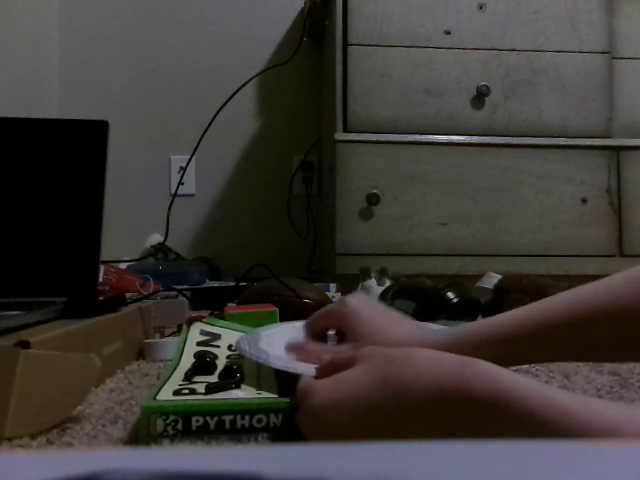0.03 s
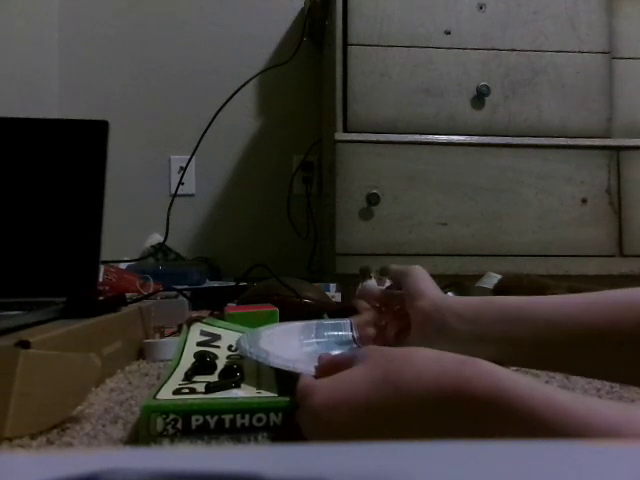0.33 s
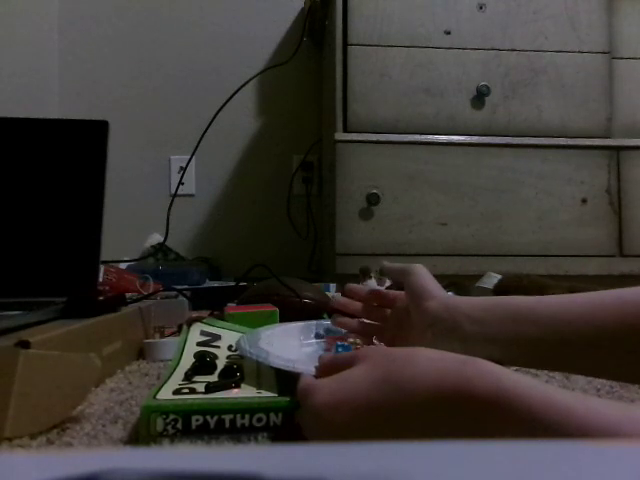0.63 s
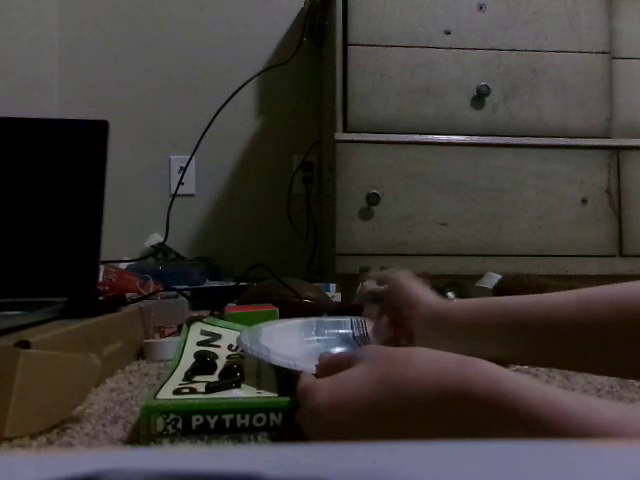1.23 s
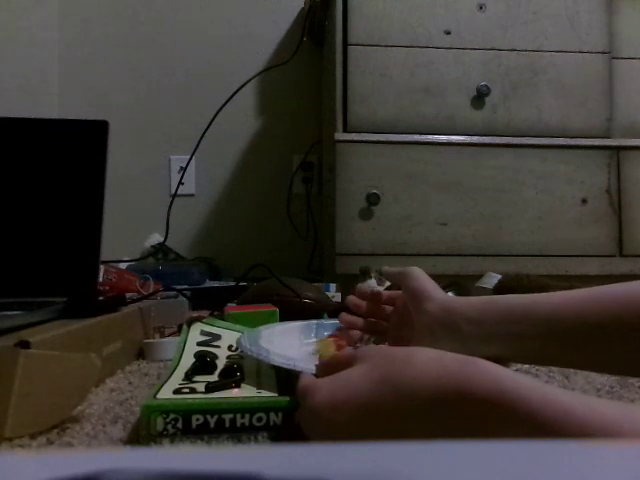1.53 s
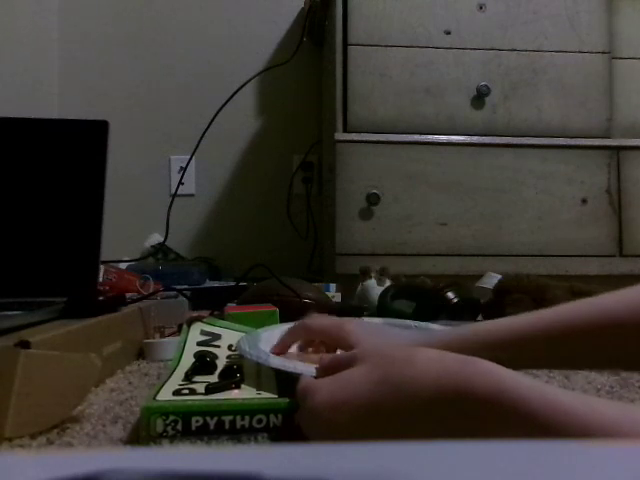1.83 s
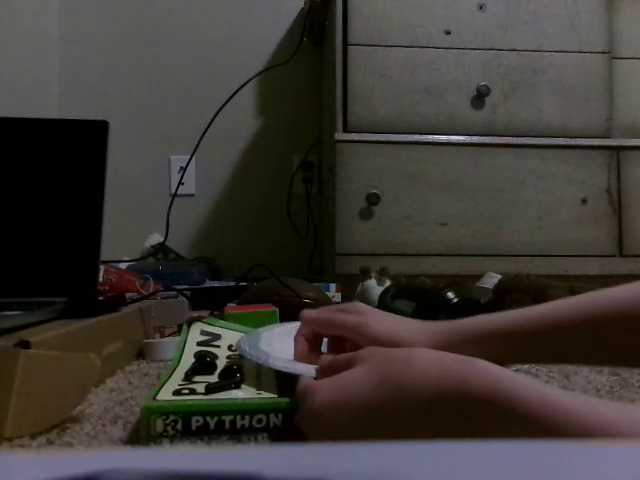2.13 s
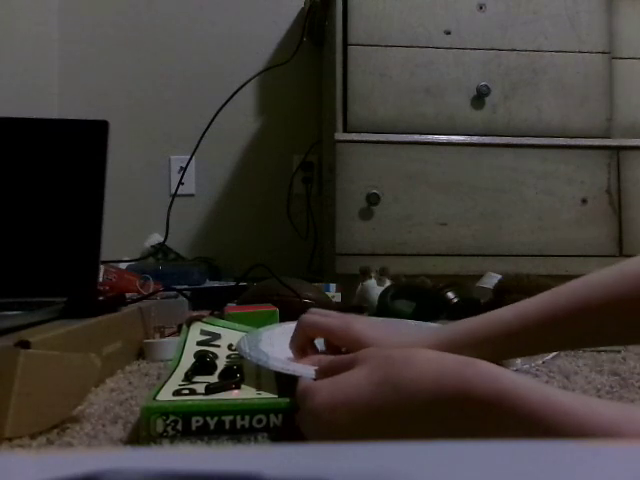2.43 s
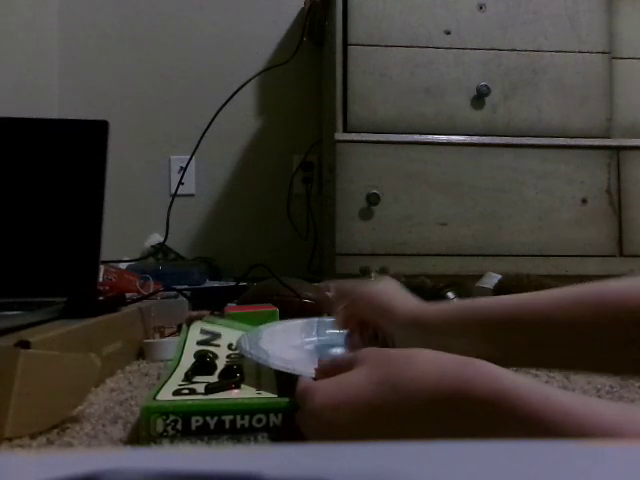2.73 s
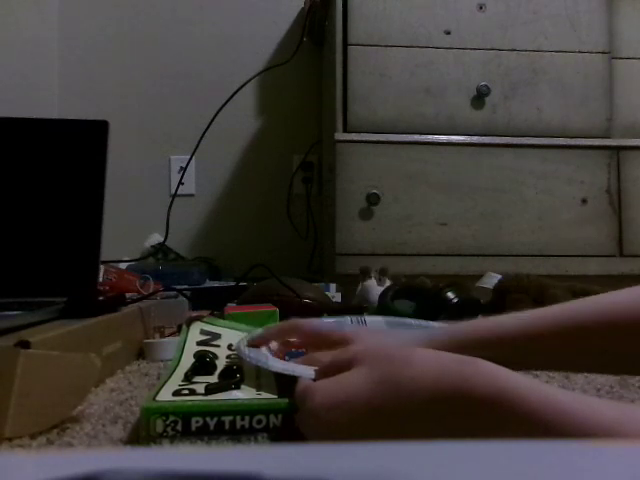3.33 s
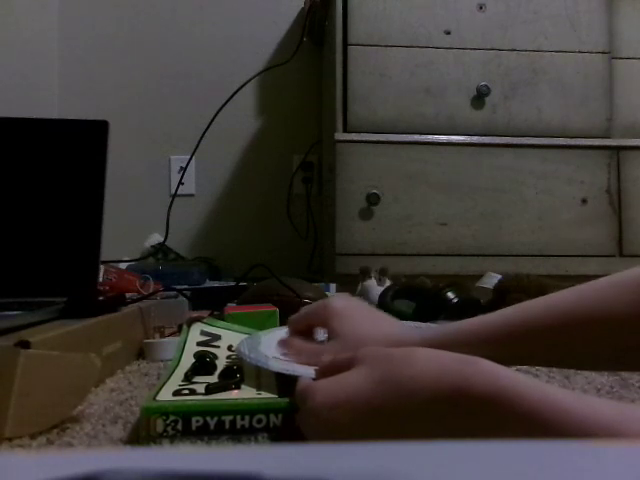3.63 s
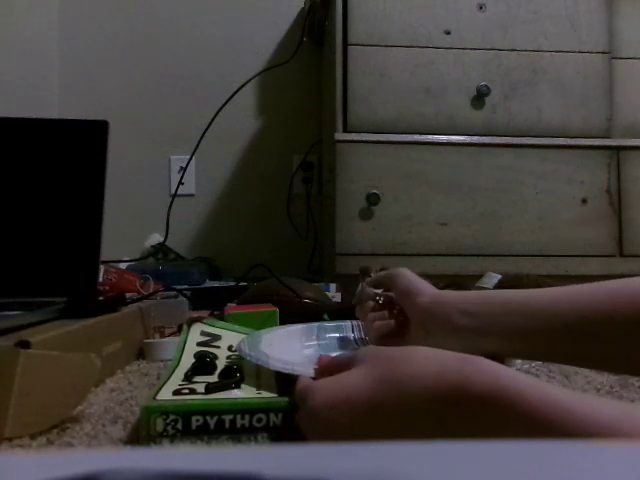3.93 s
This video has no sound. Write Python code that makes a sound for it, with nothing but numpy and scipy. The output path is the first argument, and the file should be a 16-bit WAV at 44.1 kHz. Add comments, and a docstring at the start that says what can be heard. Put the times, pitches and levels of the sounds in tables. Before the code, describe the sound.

Small dice clatter into a thin plastic dish three times, scooped up by hand between drops.

```python
"""Small dice drop into a thin plastic dish, scooped up by hand and let fall three times over.
Each landing clacks on the plastic, buzzes the wall and thumps the bottom like a small drum;
die against die gives a short bright click. Between the clear hits the dice tumble in the dish
or jostle and tick in the fist, and the hand bumps the dish with a soft knock.
Behind them is a quiet furnished room with a low rumble, faint hiss and hum."""
import sys
import numpy as np
from scipy import signal
from scipy.fft import rfft, irfft, next_fast_len
from scipy.io import wavfile
from scipy.ndimage import map_coordinates

SR = 44100
rng = np.random.default_rng(int(sys.argv[2]) if len(sys.argv) > 2 else 0)


def pcm_store(signal):
    """Save signal as 16-bit PCM."""
    levels = np.round(np.clip(np.atleast_2d(signal), -1, 1) * 32767)
    wavfile.write(sys.argv[1], SR, levels.astype(np.int16).T)


N = 176400

# Cue levels are set ahead of the trims below; an EQ gives only the shape of a spectrum.
# dice landing in the dish: start_s, level_db, tilt_db_per_octave, thump_db, pitch_hz
LANDINGS = [(0.4326, -31, 2.5, -24.5, 295), (0.441, -31, 3, -57, 350), (0.471, -33.5, 2, -32.5, 345),
            (0.5365, -36, 5, -31, 289), (0.5418, -37, 3.5, -47, 315), (0.5496, -32.5, -1.5, -33, 329),
            (0.5544, -33.5, 0.5, -42, 318), (0.6076, -36, 1.5, -32.5, 277), (0.6152, -33, 1, -41, 310),
            (0.579, -35.5, 4, -54, 330), (0.6712, -33.5, 0.5, -37, 353), (0.718, -43, 6, -51, 327),
            (0.722, -39.5, 0.5, -41, 340), (0.7614, -42.5, -4.5, -49, 266), (0.9118, -50, 6, -46, 323),
            (0.9368, -43, 1, -33.5, 322), (0.9412, -39, -0.5, -42, 320), (1.3679, -35, -5, -27, 346),
            (1.3755, -38, 7, -33.5, 315), (1.3864, -40.5, 4.5, -57, 318), (1.4431, -36.5, 1.5, -23.5, 334),
            (1.466, -31, -4, -34, 426), (1.4682, -32, 7, -30, 397), (1.4903, -51, 13, -26, 301),
            (1.523, -33, 1.5, -22, 314), (1.541, -46, 11, -58, 387), (1.5499, -35.5, -0.5, -42, 375),
            (1.6, -61, -3, -29, 276), (1.6032, -34.5, 0.5, -58, 278), (1.6492, -51, 2, -33.5, 341),
            (1.6658, -36.5, 1.5, -30.5, 342), (1.8209, -40.5, 0.5, -39, 423),
            (1.8627, -34.5, -15.5, -70, 320), (1.8762, -43.5, 2, -28.5, 330), (1.981, -49, 3, -31, 303),
            (2.1252, -39.5, -10, -44, 294), (2.1406, -39, 3, -39, 400), (2.171, -45, -3, -39.5, 300),
            (2.2686, -42, 5, -33.5, 337), (2.4029, -35, -1, -65, 395), (2.4085, -38.5, -10, -44, 410),
            (2.9432, -33.5, 2.5, -30, 350), (2.952, -31.5, 2, -26.5, 288), (2.9828, -39, 7, -43, 303),
            (2.989, -37, 0, -31.5, 310), (3.0127, -33.5, -3.5, -59, 334), (3.0232, -36, -5, -31.5, 313),
            (3.0564, -28, -6, -28, 345), (3.0948, -41, 2, -41, 310), (3.1109, -38.5, -11, -30.5, 325),
            (3.198, -35, 4, -34.5, 432), (3.355, -31.5, -1.2, -34, 435), (3.3656, -38, -1, -55, 430),
            (3.3703, -38, -3, -38, 402), (3.4872, -30.5, -13.5, -52, 315), (3.8723, -31, -5.5, -35, 408)]
# tone of a die hitting plastic: frequency_hz, level_db
CLACK_EQ = [(200, -26.5), (370, 8), (700, -1), (1300, 3.5), (1800, 5), (2600, 2.5), (3600, 1.5), (5000, -5),
            (6500, -14), (9500, -12), (12000, -21.5), (16000, -36)]
# tone of the buzzing dish wall: frequency_hz, level_db
BUZZ_EQ = [(1200, -30.5), (2300, 0.5), (3200, 1.5), (5500, -24)]
# modes of the dish bottom under a die: pitch_ratio, level_db, t60_s
BOTTOM_MODES = [(.78, -45, 0.069), (1.002, 4, 0.039), (1.327, -8, 0.065), (2.15, -13.5, 0.039)]
# dice striking each other: start_s, level_db, tilt_db_per_octave, thump_db
COLLISIONS = [(0.018, -37, -1, -60), (0.0302, -30, 0, -69), (0.033, -29, 5, -62), (0.044, -33, -4.5, -62),
              (0.0861, -35, -4.5, -52.5), (0.4815, -35, -5.5, -63), (0.5083, -48, -2, -67),
              (0.5235, -43, -1, -68), (0.558, -38, -2, -60), (0.5668, -37.5, -6, -56),
              (0.5996, -40, -2, -37), (0.6386, -36.5, 0, -61), (0.887, -31.5, 20, -61),
              (0.949, -26.5, 3.5, -41), (0.9597, -29, 0.5, -69), (0.9642, -28.5, -3.5, -64),
              (0.9727, -30, -1, -47), (0.9778, -32, 2, -52), (0.9876, -34, 0, -43),
              (0.9913, -30.5, 3, -42.5), (1.028, -35, -2, -50), (1.0438, -30.5, 7, -53),
              (1.0478, -27.5, 0, -45), (1.0799, -35.5, -2.5, -72), (1.405, -37.5, 3, -45),
              (1.427, -30, -5.5, -54), (1.4544, -36, 1, -62), (1.5175, -31.5, -2.5, -46),
              (1.5541, -30.5, -8.5, -34.5), (1.5649, -36.5, -5, -39), (1.6278, -42, -4, -63),
              (1.7095, -44.5, 7, -45), (1.8384, -27.5, 11, -43), (1.955, -29.5, -5.5, -46),
              (1.9579, -32.5, 0, -42), (1.969, -28.5, -2, -56), (2.0074, -29.5, 14, -59),
              (2.0178, -35, 12, -53), (2.0245, -37, 4, -50), (2.0289, -31, 4, -61), (2.4071, -31, 11, -66),
              (2.4158, -28.5, -6.5, -52), (2.4255, -29.5, 10, -61), (2.4278, -28, -2, -50),
              (2.463, -38.5, 0.5, -39.5), (2.54, -36, -1, -48), (2.9405, -37.5, 6, -58),
              (2.9647, -35.5, -6, -65), (2.9705, -32.5, 4, -66), (3.0066, -36, 7, -51),
              (3.0199, -29.5, 0, -33), (3.039, -40, 5, -64), (3.064, -31, 2, -54), (3.1174, -36.5, 1, -38),
              (3.1394, -46, 2, -61), (3.16, -40.5, -3, -59), (3.2716, -39.5, -4, -42.5),
              (3.3946, -36.5, -6, -52), (3.418, -38, 2, -68), (3.475, -37, -1, -76),
              (3.4793, -29, 1.5, -61), (3.5105, -33, 7, -51), (3.521, -37, -17, -47), (3.5746, -34, 8, -66),
              (3.5795, -29.5, 8, -43), (3.6129, -35, 2, -61), (3.6203, -41, -9, -68), (3.7331, -40, 1, -43),
              (3.7417, -38, -8, -73), (3.7463, -39, 6, -46), (3.7541, -24, -0.5, -55),
              (3.756, -27.5, 1.5, -35)]
# tone of die against die: frequency_hz, level_db
CLICK_EQ = [(400, -12), (1500, -14.5), (2400, -2), (3600, -3), (4800, 3.5), (6500, -0.5), (8500, 0.5),
            (10200, -0.5), (12000, -13), (16000, -26)]
# dice tumbling on the plastic: start_s, length_s, level_db, fade_db
TUMBLE_SPELLS = [(.445, 0.052, -38.5, 14), (.54, 0.049, -42, 3), (.61, 0.088, -46, -2.5),
                 (.71, 0.14, -48, 9.5), (.868, 0.028, -54, -12), (.91, 0.044, -46, -2.5),
                 (1.37, 0.057, -49, 22), (1.47, 0.12, -46.5, 2.5), (1.61, 0.11, -53, -5),
                 (1.85, 0.04, -40.5, 5.5), (1.9, .2, -52, -1.5), (2.12, 0.29, -50.5, 9.5),
                 (2.405, .035, -56, -5), (2.945, 0.21, -50, -8), (3.145, 0.2, -50, 0),
                 (3.366, 0.025, -44, 2.5), (3.39, 0.11, -54.5, -12)]
# tone of the tumbling: frequency_hz, level_db
TUMBLE_EQ = [(150, -39), (230, 7), (315, 14.5), (430, 6), (540, -3.5), (700, 2.5), (1000, -5), (2500, -3.5),
             (3500, -8), (5000, -10.5), (6500, -14.5), (9500, -15.5), (12000, -20), (16000, -51)]
# dice jostling as the fist closes or opens: start_s, length_s, level_db, fade_db
JOSTLE_SPELLS = [(0, 0.033, -38, 3.5), (.04, 0.07, -55, -2), (.848, 0.0017, -47.5, -3),
                 (.96, 0.041, -37.5, 8.5), (1.0, 0.094, -51.5, 1.5), (1.956, 0.033, -45, -6.5),
                 (1.99, 0.056, -50, -0.5), (2.381, 0.0016, -44, 0), (2.408, 0.025, -51.5, -5),
                 (2.44, 0.16, -45, 13), (3.49, 0.068, -50, -3), (3.573, 0.069, -45, 9),
                 (3.734, 0.011, -35.5, 3), (3.747, 0.0087, -36.5, -4), (3.76, 0.019, -36.5, 11)]
# tone of the jostling: frequency_hz, level_db
JOSTLE_EQ = [(200, -6), (330, 16), (600, -8.5), (1500, -4), (2400, -1), (3600, 4.5), (4800, -1), (6500, -3),
             (8800, 1.5), (10300, -1), (12000, -11.5), (16000, -36)]
# dice shifting in the closed fist: start_s, length_s, level_db, fade_db
SHIFT_SPELLS = [(.342, 0.13, -61, 1.5), (1.163, 0.0113, -59, 1), (1.32, 0.038, -71, 12),
                (2.827, .01, -39, 6.5), (3.978, 0.0043, -52, 0)]
# dice touching in the closed fist: start_s, level_db, tilt_db_per_octave
TICKS = [(0.2633, -53, -12), (0.286, -58.5, -11), (0.394, -44.5, -5), (0.4265, -37, -2), (1.162, -46, -7),
         (1.222, -56, -8), (1.3115, -44.5, -2), (1.3274, -46, -3), (1.3349, -44, 13), (1.3397, -41, -3),
         (1.352, -42, 8), (2.8047, -39.5, -5.5), (2.8263, -40, -1.5), (2.9143, -33, 5), (2.935, -44, -3),
         (3.722, -42.5, -8), (3.8508, -41, -12.5), (3.967, -32.5, -4), (3.9727, -43.5, 25),
         (3.998, -36.5, -9)]
# tone of dice muffled by the fist: frequency_hz, level_db
FIST_EQ = [(400, -13), (1500, -22.5), (2700, -4.5), (3400, -1.5), (4800, 4), (5600, -3), (6500, -6),
           (9500, -6), (12000, -17), (16000, -61)]
# a die left ringing faintly: start_s, level_db
DIE_PINGS = [(0.087, -54.5), (0.1, -55)]
# modes of that die: pitch_hz, level_db, t60_s
DIE_MODES = [(8060, -1, 0.14), (8290, -5, 0.1), (6720, -4, 0.14), (5230, -2, 0.14), (5480, -6, 0.09),
             (4360, -6, 0.1)]
# the hand bumping the dish: start_s, ring_db, push_db
HAND_KNOCKS = [(.087, -34, -51), (2.266, -41, -50), (2.568, -41, -58), (2.7635, -31.5, -28.5),
               (3.127, -31.5, -50), (3.4875, -23.5, -35)]
# the dull push of the flesh, gone in a few cycles: pitch_hz, level_db, t60_s
PUSH_MODES = [(215, 0, 0.015)]
# modes of the dish under a soft knock: pitch_hz, level_db, t60_s
KNOCKED_DISH_MODES = [(307, 0, 0.055), (450, -8, 0.045), (676, -17, 0.07), (1265, -30, 0.04)]
# reverb time of the room: frequency_hz, t60_s
REVERB_DECAY = [(200, 0.19), (1000, 0.35), (3000, 0.28), (8000, 0.27), (15000, 0.13)]
# reverb level across the spectrum: frequency_hz, level_db
REVERB_SEND = [(200, -0.5), (330, -11.5), (1000, -7), (3000, -7), (8000, -11), (15000, -10.5)]
# tone of the rumble and hiss: frequency_hz, level_db
ROOM_TONE_EQ = [(15, -7.5), (28, -10), (40, 2.5), (52, -22), (100, -16.5), (170, -20.5), (300, -22),
                (600, -37.5), (1200, -39), (4000, -42.5), (10000, -48.5), (16000, -51)]
# partials of the hum: pitch_hz, level_db
HUM_PARTIALS = [(28, -55.5), (81, -65.5), (120, -66), (162, -62.5)]

# envelope of a hit, a crack over a weaker ring: crack_t60_s, ring_db, ring_t60_s
CLACK_SHAPE, CLICK_SHAPE, TICK_SHAPE = (0.0065, -21, 0.03), (0.0055, -25, 0.018), (0.0053, -38, 0.011)
CLACK_TRIM_DB, BUZZ_TRIM_DB, CLICK_TRIM_DB, TICK_TRIM_DB = -2, -17.5, -4.5, -3.5
LANDING_THUMP_TRIM_DB, CLICK_THUMP_TRIM_DB = 0.5, 3.5
HIT_ATTACK_S, HIT_HEAD_S = 0.00035, 0.0025  # a hit's level is the rms of its head
ECHO_MIN_S, ECHO_MAX_S, ECHO_SUM_DB = 0.00078, 0.013, -13.5  # off the rim and the furniture
TOP_HZ = 16000


def landings():
    """Each falling die clacks on the plastic, shakes the wall and thumps the bottom."""
    out = np.zeros(N)
    for start_s, db, tilt, thump_db, pitch_hz in LANDINGS:
        add(out, start_s, amp(db + CLACK_TRIM_DB) * hard_hit(CLACK_EQ, tilt, CLACK_SHAPE, snap=2.35))
        add(out, start_s, amp(db + BUZZ_TRIM_DB) * wall_buzz())
        add(out, start_s, amp(thump_db + LANDING_THUMP_TRIM_DB) * bottom_thump(pitch_hz))
    return out


def hard_hit(eq, tilt, shape, snap, echoes=6):
    """One hard contact: a snap, a crack, the short ring of dense modes and a few close echoes."""
    crack_t60_s, ring_db, ring_t60_s = shape
    t = np.arange(SR // 12) / SR
    attack = 1 - np.exp(-t / HIT_ATTACK_S)
    decay = amp(-60 * t / crack_t60_s) + amp(ring_db - 60 * t / ring_t60_s)
    burst = rng.standard_normal(len(t)) * decay * attack
    burst[round(HIT_ATTACK_S * SR)] += snap
    direct = signal.fftconvolve(burst, eq_impulse(eq, tilt))
    direct /= np.sqrt(np.mean(direct[:round(HIT_HEAD_S * SR)] ** 2))
    delays_s = ECHO_MIN_S + (ECHO_MAX_S - ECHO_MIN_S) * rng.random(echoes) ** 2
    out = direct.copy()
    for delay_s, polarity in zip(delays_s, rng.choice([-1, 1], echoes)):
        add(out, delay_s, polarity * amp(ECHO_SUM_DB) / np.sqrt(echoes) * direct)
    return out


def wall_buzz(t60_s=0.17):
    """Many close modes of the thin plastic wall die away together."""
    t = np.arange(SR // 10) / SR
    burst = rng.standard_normal(len(t)) * amp(-60 * t / t60_s)
    return signal.fftconvolve(burst, eq_impulse(BUZZ_EQ))


def bottom_thump(pitch_hz):
    """The thin bottom of the dish flexes like a small drum."""
    modes = [(pitch_hz * ratio, db, t60_s) for ratio, db, t60_s in BOTTOM_MODES]
    return ring(modes, attack_s=0.0016, scatter_db=1.5)


def ring(modes, attack_s, scatter_db):
    """A struck body rings in damped sines, their balance fresh on every hit."""
    t = np.arange(SR // 6) / SR
    out = np.zeros(len(t))
    for hz, db, t60_s in modes:
        out += amp(db + scatter_db * rng.normal() - 60 * t / t60_s) * np.sin(2 * np.pi * hz * t)
    return out * (1 - np.exp(-t / attack_s))


def dish_low_cut(x, cutoff_hz=213):
    """The dish is too small to radiate its deepest tones."""
    return signal.sosfilt(signal.butter(2, cutoff_hz, btype="high", fs=SR, output="sos"), x)


def clicks(dish_hz=325, pitch_spread=0.067):
    """Die against die: a bright click, with a little of the blow passed on to the dish."""
    out = np.zeros(N)
    for start_s, db, tilt, thump_db in COLLISIONS:
        add(out, start_s, amp(db + CLICK_TRIM_DB) * hard_hit(CLICK_EQ, tilt, CLICK_SHAPE, snap=1.5))
        pitch_hz = dish_hz * np.exp(pitch_spread * rng.normal())
        add(out, start_s, amp(thump_db + CLICK_THUMP_TRIM_DB) * bottom_thump(pitch_hz))
    return out


def rattle(spells, eq, hits_per_s, range_db, t60_s):
    """Dice rattle in spells of tiny, unevenly spaced cracks; a negative fade makes a spell swell."""
    out, impulses = np.zeros(N), np.zeros(N + SR)
    decay = amp(-60 * np.arange(SR // 40) / SR / t60_s)
    lateness, strength = rng.random((N // 20, 2)).T
    onsets = ((np.arange(len(lateness)) + lateness) * SR / hits_per_s).astype(int)
    inside = onsets < N
    impulses[onsets[inside]] = amp(range_db * (strength[inside] - 1))
    grit = rng.standard_normal(N + SR)
    for start_s, length_s, db, fade_db in spells:
        first, samples = round(start_s * SR), round(length_s * SR)
        hits = impulses[first:first + samples] * amp(-fade_db * np.linspace(0, 1, samples))
        hits[0] = 0.4  # every spell opens on a hit
        power = signal.fftconvolve(hits ** 2, decay ** 2)
        spell = np.sqrt(np.abs(power)) * grit[first:first + len(power)]
        add(out, start_s, amp(db - fade_db / 2) * np.sqrt(samples) * spell / np.linalg.norm(spell))
    return signal.fftconvolve(out, eq_impulse(eq))[:N]


def fist_ticks():
    """Carried dice tick against each other, muffled by the fist."""
    out = np.zeros(N)
    for start_s, db, tilt in TICKS:
        add(out, start_s, amp(db + TICK_TRIM_DB) * hard_hit(FIST_EQ, tilt, TICK_SHAPE, snap=1.16))
    return out


def die_pings():
    """One die rings on for a moment, and again as it rebounds."""
    out = np.zeros(N)
    for start_s, db in DIE_PINGS:
        add(out, start_s, amp(db) * ring(DIE_MODES, attack_s=0.00011, scatter_db=4.5))
    return out


def hand_knocks(push_lead_s=0.0029):
    """The hand bumps the dish: a dull push, then the dish's low modes."""
    out = np.zeros(N)
    for start_s, ring_db, push_db in HAND_KNOCKS:
        push = ring(PUSH_MODES, attack_s=0.0014, scatter_db=2.5)
        add(out, start_s - push_lead_s, amp(push_db) * push)
        add(out, start_s, amp(ring_db) * ring(KNOCKED_DISH_MODES, attack_s=0.0013, scatter_db=2.0))
    return out


def room_reverb(x, predelay_s=0.003, stretches=16):
    """A small furnished room; a fresh tail for each stretch stands for the moving dice and hands."""
    out = np.zeros(N)
    for indices, stretch in zip(np.array_split(np.arange(N), stretches), np.array_split(x, stretches)):
        hz, t, noise = signal.stft(rng.standard_normal(SR // 2), SR, nperseg=256)
        decay = amp(-60 * t / curve_at(REVERB_DECAY, hz)[:, None])
        _, tail = signal.istft(noise * decay, SR, nperseg=256)
        add(out, indices[0] / SR + predelay_s, signal.fftconvolve(stretch, tail / np.linalg.norm(tail)))
    return filtered(out, lambda hz: amp(curve_at(REVERB_SEND, hz)))


def room_tone(noise_db=-53.5, waver_db=1.5, drift_rad=0.4):
    """A bed of low rumble and faint hiss under a wavering hum."""
    t = np.arange(N) / SR
    hum = np.zeros(N)
    for hz, db in HUM_PARTIALS:
        rms = amp(db + waver_db * wobble(5.55))
        hum += rms * np.sqrt(2) * np.sin(2 * np.pi * hz * t + drift_rad * wobble(4.6))
    noise = filtered(rng.standard_normal(N), lambda hz: amp(curve_at(ROOM_TONE_EQ, hz)))
    return hum + amp(noise_db) * noise / np.sqrt(np.mean(noise ** 2))


def amp(db):
    """Decibels to gain."""
    return 10 ** (np.asarray(db) / 20)


def curve_at(points, hz):
    """Read (frequency_hz, value) points along a log frequency axis."""
    point_hz, values = np.transpose(points)
    return np.interp(np.log(hz + 1), np.log(point_hz + 1), values)


def add(track, start_s, sound):
    """Mix a sound into the track at its cue."""
    first = max(0, round(start_s * SR))
    track[first:first + len(sound)] += sound[:max(0, len(track) - first)]


def filtered(x, gain_at):
    """Shape x with a gain that depends on frequency."""
    size = next_fast_len(N + SR // 2)
    return irfft(rfft(x, size) * gain_at(np.fft.rfftfreq(size, 1 / SR)), size)[:N]


def eq_impulse(eq, tilt=0, size=2048):
    """Unit-energy impulse response of an EQ, tilted in dB per octave from 900 to 11500 Hz."""
    hz = np.fft.rfftfreq(size, 1 / SR)
    octaves = np.log2(np.clip(hz, 900, 11500))
    cepstrum = irfft(np.log(amp(curve_at(eq, hz) + tilt * octaves)))
    cepstrum[1:size // 2] *= 2  # fold to minimum phase, which keeps attacks sharp
    cepstrum[size // 2 + 1:] = 0
    response = irfft(np.exp(rfft(cepstrum)))
    return response / np.linalg.norm(response)


def wobble(knots_per_s):
    """A smooth random modulation curve."""
    knots = rng.standard_normal(int(N * knots_per_s / SR) + 4)
    return map_coordinates(knots, [np.arange(N) * knots_per_s / SR])


def scene():
    """Mono mix of dice, dish and hand, with reverb and room tone."""
    tumbling = rattle(TUMBLE_SPELLS, TUMBLE_EQ, hits_per_s=150, range_db=16.5, t60_s=0.026)
    jostling = rattle(JOSTLE_SPELLS, JOSTLE_EQ, hits_per_s=400, range_db=8, t60_s=0.016)
    shifting = rattle(SHIFT_SPELLS, FIST_EQ, hits_per_s=230, range_db=16, t60_s=0.011)
    in_dish = dish_low_cut(landings() + clicks() + tumbling + jostling)
    dice = in_dish + fist_ticks() + die_pings() + hand_knocks() + shifting
    return (dice + room_reverb(dice) + room_tone())[None]


def record(dry):
    """A brick-wall high cut on the whole mix."""
    return filtered(dry[0], lambda hz: hz < TOP_HZ)[None]


dry = scene()
out = record(dry)
pcm_store(out)
```